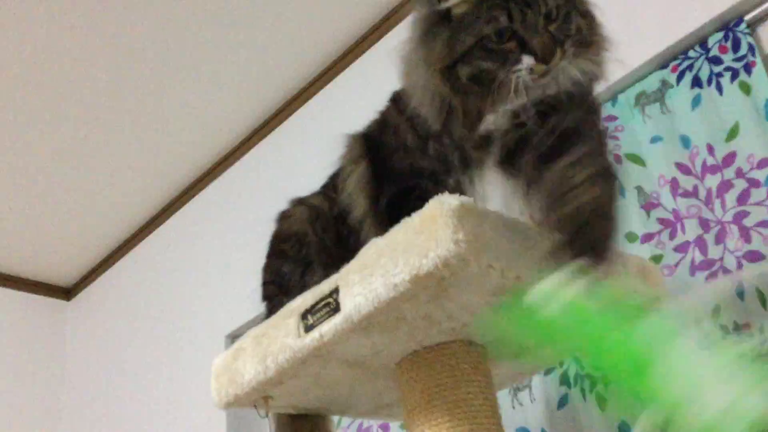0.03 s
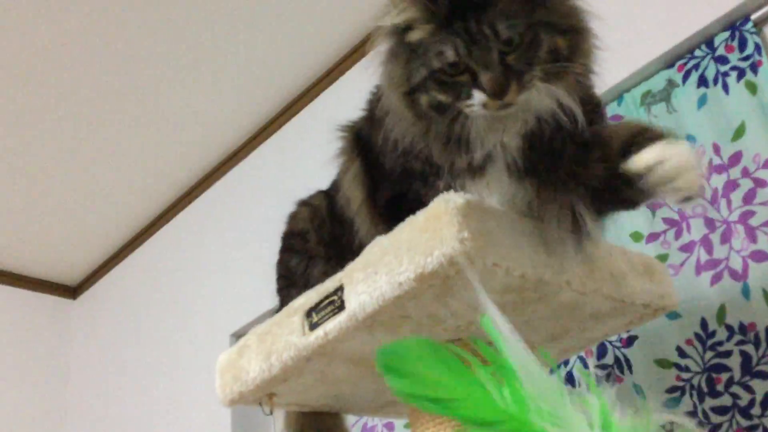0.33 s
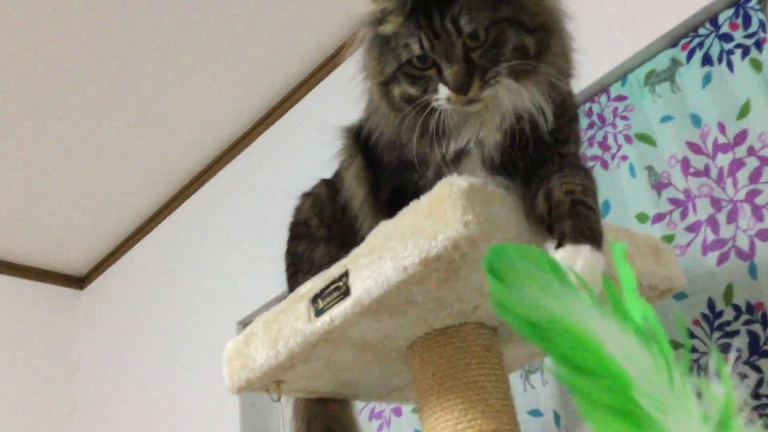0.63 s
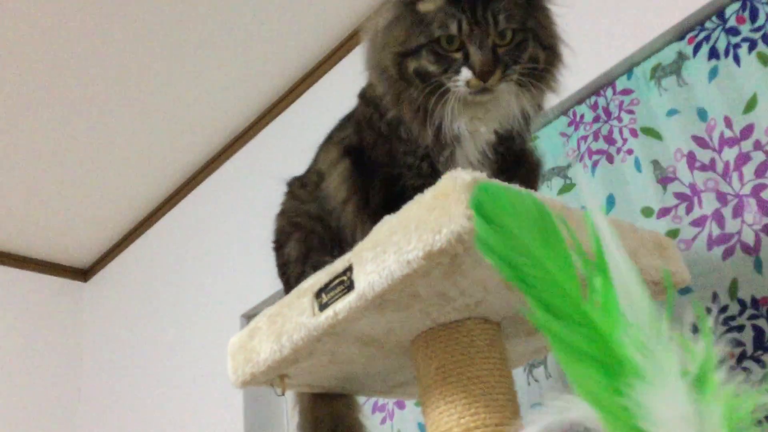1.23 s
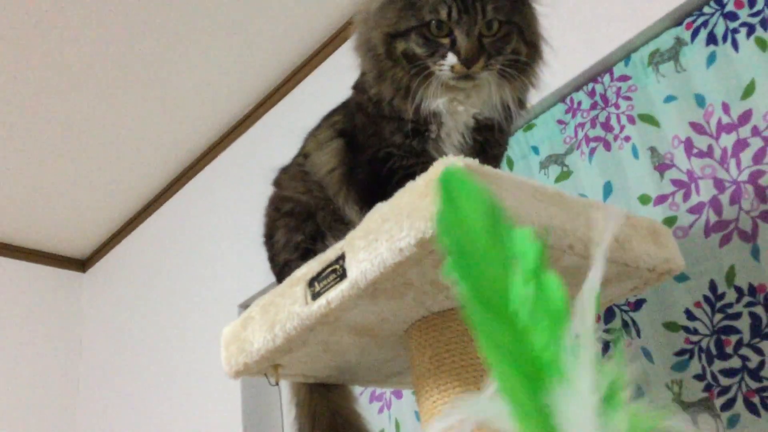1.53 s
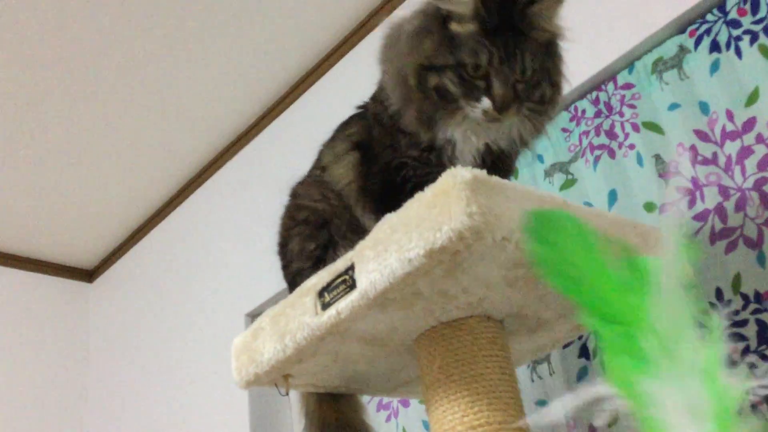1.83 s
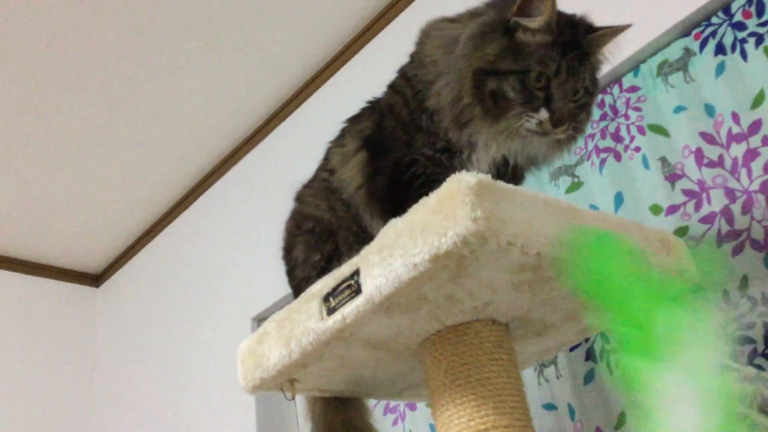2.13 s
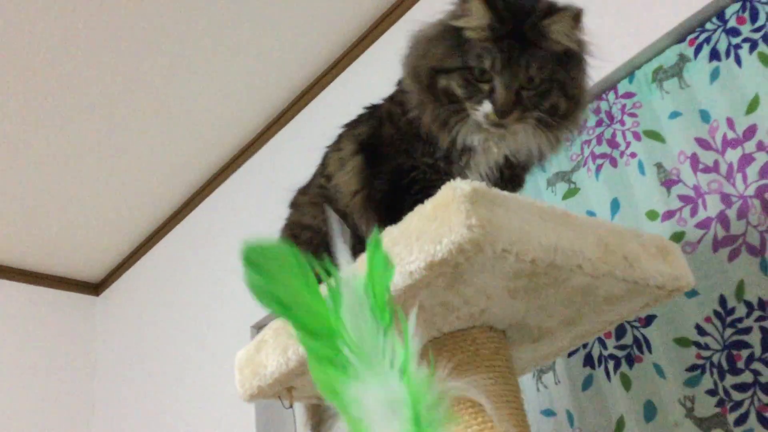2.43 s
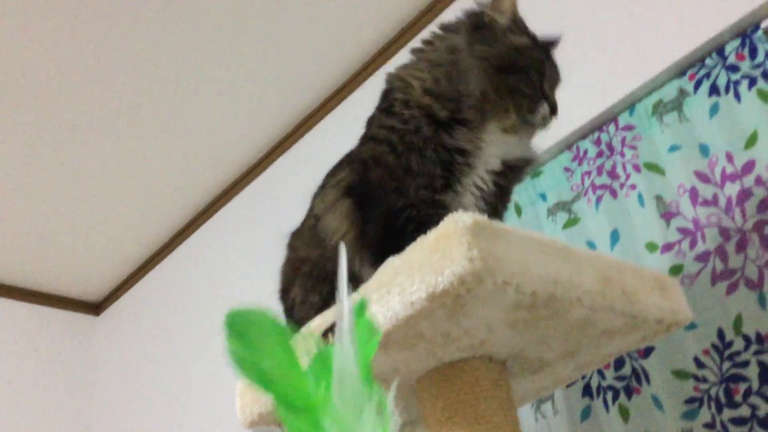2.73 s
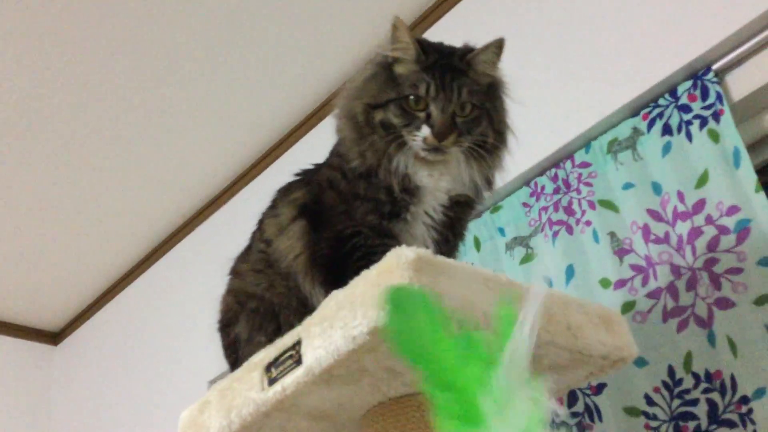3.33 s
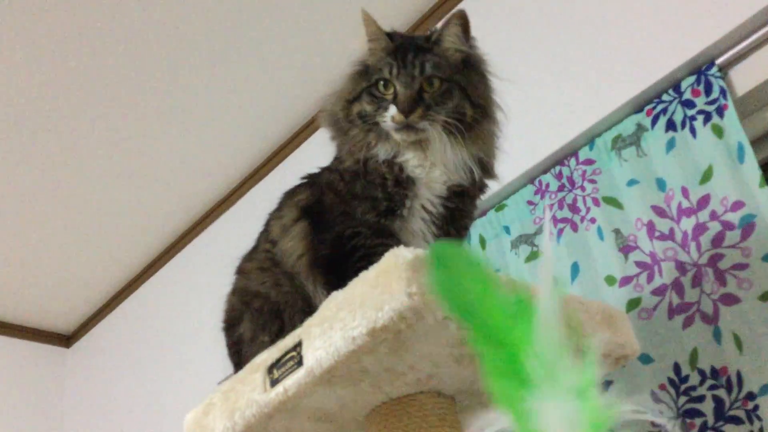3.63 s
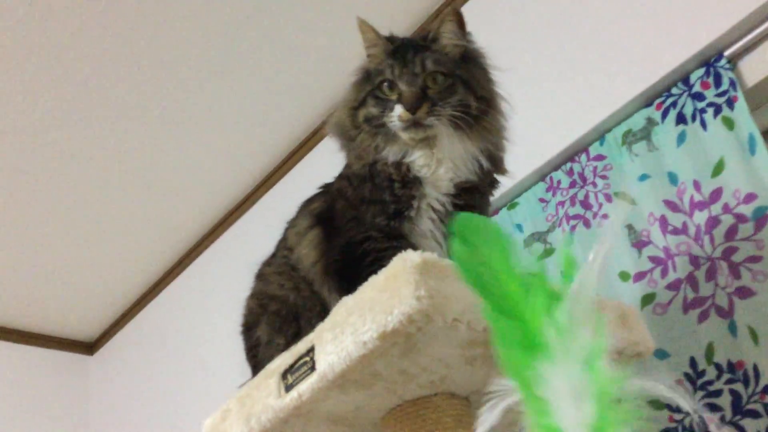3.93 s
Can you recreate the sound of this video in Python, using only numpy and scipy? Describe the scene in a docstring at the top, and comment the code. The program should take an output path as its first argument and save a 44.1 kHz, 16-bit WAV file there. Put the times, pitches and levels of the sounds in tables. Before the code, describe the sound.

A tiny bell on a waved feather toy jingles in thin, high, irregular bursts. It thins out, almost stops, then picks up again, over a low, steady noise in a quiet room.

```python
"""Over a low, steady room noise, a tiny pellet bell on a feather wand is shaken into a busy jingle.
Each knock of the pellet chokes the last ring, ticks and rings two high modes of the shell afresh;
then the pellet bounces and rolls on, and the walls add a short tail. Three faint, dry taps of the toy
fall in the first second and a half. The jingle thins out, almost rests just before three seconds,
then picks up again to the end."""
import sys
import numpy as np
from scipy import signal
from scipy.fft import rfft, irfft
from scipy.io import wavfile

SR = 44100
rng = np.random.default_rng(int(sys.argv[2]) if len(sys.argv) > 2 else 0)


def master(y):
    """Save y as 16-bit WAV."""
    cut = np.clip(np.atleast_2d(y).T, -1, 1)
    pcm = np.round(cut * 32767)  # scale
    wavfile.write(sys.argv[1], SR, pcm.astype(np.int16))


N = 176400

# The pellet's knocks on the shell. Each row: start in seconds, relative levels in dB of the main mode,
# the upper mode and the tick, then the main mode's t60 in seconds.
PELLET_KNOCKS = [(0.0002, -28.5, -58, -49, 0.019), (0.0562, -48.5, -68, -74, 0.12),
                 (0.1072, -49, -82, -63.5, 0.12), (0.1671, -49.5, -77, -62.5, 0.13),
                 (0.2166, -49, -71, -63, 0.099), (0.229, -42, -57, -54, 0.082),
                 (0.2341, -32, -58, -43.5, 0.04), (0.2368, -39, -59, -47.5, 0.03),
                 (0.2445, -38.5, -54, -52, 0.055), (0.2505, -41, -66, -54, 0.06),
                 (0.2585, -44, -62, -55, 0.06), (0.295, -46, -58, -69.5, 0.085),
                 (0.3145, -44.5, -61, -57.5, 0.11), (0.37, -47, -57, -57, 0.14),
                 (0.394, -58, -48.5, -79, 0.12), (0.4341, -29.5, -64, -46, 0.067),
                 (0.4388, -37, -62, -51.5, 0.03), (0.4526, -36.5, -61, -48, 0.041),
                 (0.472, -46, -57, -67.5, 0.046), (0.4943, -38, -45, -51, 0.085),
                 (0.4999, -40, -48, -52.5, 0.098), (0.5064, -37.5, -49, -50.5, 0.055),
                 (0.5135, -46, -54, -49, 0.05), (0.5187, -44, -55, -54, 0.055),
                 (0.5724, -43.5, -55, -59.5, 0.1), (0.592, -53, -51, -66, 0.066),
                 (0.6256, -45, -65, -56, 0.076), (0.6656, -40, -56, -50, 0.13),
                 (0.673, -35.5, -61, -51.5, 0.13), (0.6766, -31.5, -53, -53.5, 0.055),
                 (0.7134, -41, -55, -56, 0.09), (0.7176, -41, -60, -52, 0.06),
                 (0.7217, -28.5, -58, -47.5, 0.05), (0.73, -37.5, -47, -59.5, 0.07),
                 (0.7666, -44, -57, -64.5, 0.052), (0.82, -39, -67, -46, 0.1),
                 (0.838, -47, -63, -59.5, 0.19), (0.8715, -36, -66, -48, 0.044),
                 (0.874, -43.5, -63, -47, 0.04), (0.877, -38, -65, -50, 0.051),
                 (0.8944, -36, -60, -50, 0.02), (0.9158, -42.5, -64, -58.5, 0.078),
                 (0.927, -38.5, -69, -57.5, 0.03), (0.9589, -36.5, -60, -51, 0.05),
                 (0.9704, -46, -67, -59.5, 0.041), (1.0428, -46.5, -57, -67.5, 0.077),
                 (1.082, -54.5, -55.5, -71, 0.37), (1.1243, -38.5, -66, -45, 0.07),
                 (1.154, -38.5, -60, -48, 0.069), (1.161, -44, -64, -52, 0.038),
                 (1.2025, -48, -38.5, -47, 0.048), (1.2079, -32.5, -52, -42, 0.045),
                 (1.2149, -43, -55, -54, 0.12), (1.2377, -38.5, -46, -62.5, 0.11),
                 (1.2447, -41, -48, -53, 0.16), (1.2804, -37, -56, -48.5, 0.09),
                 (1.2886, -29.5, -45, -43, 0.12), (1.2939, -40, -49, -47, 0.06),
                 (1.2988, -34.5, -53, -49.5, 0.055), (1.304, -35.5, -50, -49.5, 0.03),
                 (1.3157, -27.5, -47, -41, 0.051), (1.3471, -39, -60, -54, 0.027),
                 (1.3691, -33.5, -47, -43.5, 0.045), (1.3885, -38, -59, -55.5, 0.053),
                 (1.3924, -34, -53, -46.5, 0.087), (1.3979, -31, -51, -53.5, 0.08),
                 (1.4723, -38, -66, -52.5, 0.053), (1.491, -45, -67, -56.5, 0.075),
                 (1.514, -37, -72, -67.5, 0.054), (1.5596, -32.5, -60, -48, 0.13),
                 (1.5685, -34.5, -52, -53.5, 0.11), (1.5742, -38, -67, -55, 0.14),
                 (1.589, -38, -52, -60.5, 0.11), (1.6629, -41.5, -58, -65, 0.066),
                 (1.684, -42, -48, -73, 0.066), (1.747, -47.5, -49.5, -66, 0.08),
                 (1.7748, -48, -87, -62, 0.12), (1.877, -62.5, -60.5, -86, 0.16),
                 (1.916, -57, -59, -71, 0.26), (2.0087, -56, -61, -66, 0.2),
                 (2.1066, -56.5, -49, -75, 0.17), (2.1748, -44, -60, -57.5, 0.085),
                 (2.182, -45.5, -67, -49, 0.074), (2.192, -43, -67, -57.5, 0.033),
                 (2.206, -44.5, -66, -58, 0.07), (2.2418, -38.5, -66, -53.5, 0.054),
                 (2.324, -53.5, -61, -72.5, 0.15), (2.4053, -50.5, -68, -70.5, 0.081),
                 (2.4306, -43.5, -53, -57, 0.16), (2.591, -54.5, -71, -61.5, 0.34),
                 (2.6353, -50, -89, -64.5, 0.13), (2.67, -53.5, -90, -74, 0.064),
                 (3.035, -62.5, -66, -69, 0.2), (3.1717, -37.5, -59, -53.5, 0.062),
                 (3.193, -41, -64, -60.5, 0.095), (3.2331, -46.5, -49, -56, 0.096),
                 (3.2527, -35.5, -65, -52, 0.038), (3.274, -45.5, -56, -56.5, 0.14),
                 (3.3565, -45.5, -66, -54, 0.07), (3.4421, -51.5, -50, -61.5, 0.063),
                 (3.4682, -48, -70, -57.5, 0.13), (3.5388, -34.5, -51, -46, 0.043),
                 (3.5523, -32.5, -53, -47.5, 0.06), (3.5782, -35, -58, -51, 0.071),
                 (3.6248, -39.5, -67, -50.5, 0.088), (3.723, -31, -66, -45.5, 0.09),
                 (3.7264, -49, -56, -58, 0.036), (3.7296, -38, -65, -51.5, 0.043),
                 (3.749, -37, -66, -53, 0.046), (3.762, -40, -67, -56.5, 0.059),
                 (3.7911, -41, -59, -62, 0.061), (3.8122, -44.5, -44, -54, 0.093),
                 (3.8185, -44.5, -46, -57, 0.071), (3.9003, -48.5, -69, -72, 0.054),
                 (3.9372, -50.5, -54, -68.5, 0.073), (3.958, -40.5, -63, -56.5, 0.037),
                 (3.9865, -45, -66, -69.5, 0.097)]
TOP_HZ = 17000


def undb(db):
    """Decibels to gain."""
    return 10 ** (np.asarray(db) / 20)


def fade(t, t60):
    """Exponential decay, 60 dB down after t60 seconds."""
    return np.exp(-np.log(1000) * t / t60)


def add(out, start, sound):
    """Mix a sound in at start seconds."""
    i = max(int(start * SR), 0)
    if i < N:
        out[i:i + len(sound)] += sound[:N - i]


def colour(x, points):
    """Minimum-phase EQ through (Hz, dB) points, scaled to unit power gain."""
    hz, db = np.array(points, float).T
    size = 2 * N
    bin_hz = np.arange(N + 1) * SR / size
    gain = undb(np.interp(np.log(bin_hz + 1), np.log(hz), db))
    cepstrum = irfft(np.log(gain / np.sqrt(np.mean(gain ** 2))))
    cepstrum[1:N] *= 2
    cepstrum[N + 1:] = 0
    return irfft(rfft(x, size) * np.exp(rfft(cepstrum)))[:N]


def room_noise(air_db=-70):
    """A steady bed of rumble and hiss with a faint appliance hum."""
    # The tone of the bed. Each row: frequency in Hz, relative level in dB.
    air_eq = [(15, -55), (28, -23.5), (48, -4), (100, -1), (160, -5), (270, -8.5), (350, -5.5), (450, -15),
              (700, -16.5), (1000, -21), (1800, -25), (4500, -25), (7000, -29.5), (12000, -29),
              (17000, -39)]
    # The partials of the hum. Each row: frequency in Hz, RMS level in dB.
    hum_partials = [(101.5, -86.5), (349.6, -90), (750, -93)]
    t = np.arange(N) / SR
    hum = sum(undb(db) * np.sqrt(2) * np.sin(2 * np.pi * (hz * t + rng.random()))
              for hz, db in hum_partials)
    return undb(air_db) * colour(rng.standard_normal(N), air_eq) + hum


def pellet_tick(db, attack_s=.00049, t60=.0072):
    """The pellet meets the shell with a tiny, sharp burst of noise."""
    t = np.arange(SR // 100) / SR
    envelope = np.minimum(t / attack_s, 1) * fade(t, t60)
    return 2 * undb(db + 1.5) * envelope * rng.standard_normal(len(t))


def shell_mode(hz, db, t60, swell_s, scatter_hz=31.8):
    """One mode of the shell swells and dies away; the pellet's load shifts its pitch each time."""
    t = np.arange(SR // 9) / SR
    pitch = hz + scatter_hz * rng.standard_normal()
    envelope = np.minimum(t / swell_s, fade(t - swell_s, t60))
    return undb(db) * envelope * np.sin(2 * np.pi * (pitch * t + rng.random()))


def small_shell(rings, edge_hz=7630):
    """So small a shell radiates hardly any low sound."""
    return signal.sosfilt(signal.butter(4, edge_hz, "high", fs=SR, output="sos"), rings)


def pellet_bounces(count=7, gap_s=.007, loss_db=3, scatter_db=2):
    """After each knock the pellet rebounds unevenly, losing energy. Gives (seconds, dB) touches."""
    touches = []
    for start, _, _, tick_db, _ in PELLET_KNOCKS:
        times = start + gap_s * np.cumsum(.2 + rng.exponential(1, count))
        falling_db = tick_db - 13 - loss_db * np.arange(count)
        touches += zip(times, falling_db + scatter_db * rng.standard_normal(count))
    return touches


def pellet_roll(per_second=200, scatter_db=3.5):
    """The pellet rolls round the shell in a stream of light contacts. Gives (seconds, dB) touches."""
    # How hard the pellet rattles between knocks. Each row: time in seconds, relative level in dB.
    rattle_curve = [(0, -66), (.2, -71.5), (.25, -59.5), (.36, -74), (.41, -62.5), (.5, -69), (.6, -75.5),
                    (.88, -61.5), (1.05, -87), (1.15, -72), (1.35, -68), (1.45, -66), (1.6, -64.5),
                    (1.87, -75), (2.15, -87), (2.19, -63), (2.37, -76), (2.45, -55), (2.52, -93),
                    (2.62, -66.5), (2.73, -91.5), (2.98, -108), (3.04, -81), (3.27, -71.5), (3.4, -79),
                    (3.55, -65), (3.7, -65), (3.74, -68), (3.88, -70), (4, -66.5)]
    count = int(per_second * N / SR)
    times = (np.arange(count) + 2 * rng.random(count)) / per_second
    rattle_db = np.interp(times, *np.array(rattle_curve).T) - 1.5
    return list(zip(times, rattle_db + scatter_db * rng.standard_normal(count)))


def pellet_bell(main_hz=11172.5, upper_hz=12615):
    """Every contact ticks and rings two shell modes, which the next knock chokes. Gives (rings, ticks)."""
    # The bright tone of a tick. Each row: frequency in Hz, relative level in dB.
    tick_eq = [(1000, -44.5), (4000, -30), (6000, -28), (7700, -16.5), (8700, -0.5), (10100, -4.5),
               (11100, 3.5), (12000, -2.5), (13300, -10.5), (14300, -16), (16200, -17), (16800, -31)]
    upper_knock_t60, touch_t60 = .1, .07
    base_swell_s, longest_swell_s, choke_s = .00088, .019, .00061
    contacts = [(start, main_db - .5, upper_db - 1, tick_db, main_t60, upper_knock_t60)
                for start, main_db, upper_db, tick_db, main_t60 in PELLET_KNOCKS]
    contacts += [(start, db + 7, db - 9, db, touch_t60, touch_t60)
                 for start, db in pellet_bounces() + pellet_roll()]
    knock_times = np.array([row[0] for row in PELLET_KNOCKS] + [np.inf])
    rings, ticks = np.zeros(N), np.zeros(N)
    for start, main_db, upper_db, tick_db, main_t60, upper_t60 in contacts:
        # A graze, with much ring and little tick, swells in more slowly.
        ring_over_tick_db = max(main_db, upper_db) - tick_db
        swell_s = min(base_swell_s * undb(ring_over_tick_db - 20) ** 2, longest_swell_s)
        ring = shell_mode(main_hz, main_db, main_t60, swell_s)
        ring += shell_mode(upper_hz, upper_db, upper_t60, swell_s)
        ring_start = start - swell_s / 2
        # The pellet's landing stills the shell just before it knocks.
        next_knock = knock_times[knock_times > start].min()
        time_left = next_knock - ring_start - np.arange(len(ring)) / SR
        add(rings, ring_start, ring * np.clip(time_left / choke_s, 0, 1))
        add(ticks, start, pellet_tick(tick_db))
    return small_shell(rings), colour(ticks, tick_eq)


def room(x, send_db=0, predelay_s=.0027):
    """Direct sound, close reflections and the walls' tail; the echoes keep changing as the wand moves."""
    early, late = (.047, -5.5), (.16, -4)  # t60 in seconds, dB relative to the send
    t = np.arange(SR // 2) / SR
    hop = N // 40
    out = x.copy()
    for start in range(-hop, N, hop):
        span = np.arange(max(start, 0), min(start + 2 * hop, N))
        echoes = 0
        for t60, db in (early, late):
            tail = rng.standard_normal(len(t)) * fade(t, t60) * (t > predelay_s)
            echoes += undb(db + send_db) * tail / np.linalg.norm(tail)
        crossfade = np.sin(np.pi * (span - start) / (2 * hop))
        add(out, span[0] / SR, signal.fftconvolve(x[span] * crossfade, echoes))
    return out


def toy_taps():
    """The toy taps faintly: short bursts of band-passed noise, duller than the bell."""
    # The taps. Each row: start in seconds, level in dB, centre in Hz, width in octaves, t60 in seconds.
    taps = [(.2955, -68.5, 2840, 0.13, 0.11), (.569, -72, 3300, 0.87, 0.023),
            (1.3895, -59, 3140, 0.28, 0.0096)]
    out, t = np.zeros(N), np.arange(SR // 4) / SR
    for start, db, hz, octaves, t60 in taps:
        edges_hz = np.minimum(hz * 2 ** (np.array([-.5, .5]) * octaves), TOP_HZ)
        bandpass = signal.butter(1, edges_hz, "band", fs=SR, output="sos")
        burst = signal.sosfilt(bandpass, rng.standard_normal(len(t)))
        add(out, start, undb(db) * burst / burst.std() * fade(t, t60))
    return out


def scene():
    """Room noise, bell and toy in mono, with the ringing drier than the ticks and taps."""
    rings, ticks = pellet_bell()
    return (room_noise() + room(toy_taps() + ticks) + room(rings, send_db=-3.5))[None]


def record(dry):
    """A steep low-pass shaves off the very top."""
    return signal.sosfilt(signal.ellip(8, .2, 70, TOP_HZ, fs=SR, output="sos"), dry)


dry = scene()
out = record(dry)
master(out)
```